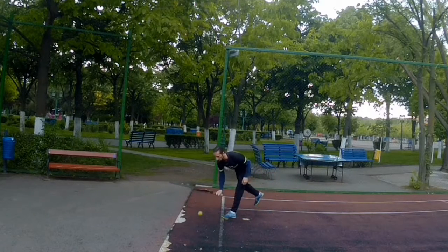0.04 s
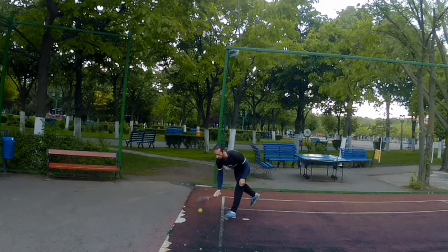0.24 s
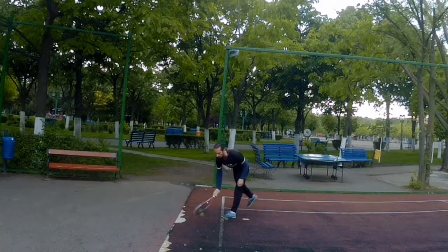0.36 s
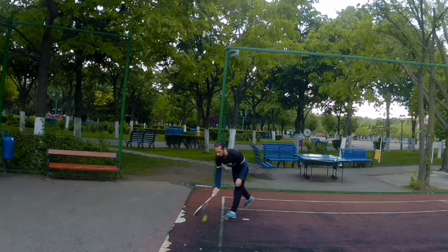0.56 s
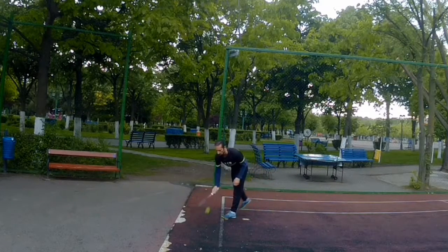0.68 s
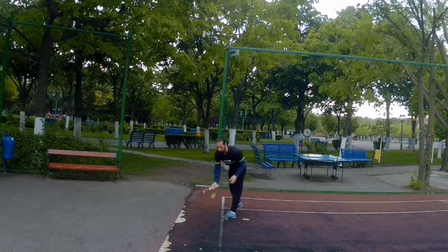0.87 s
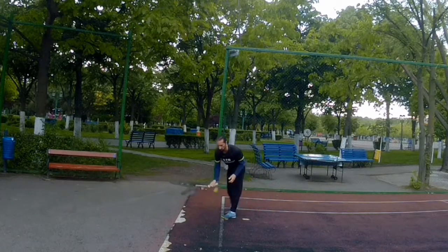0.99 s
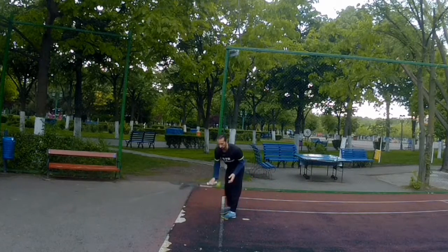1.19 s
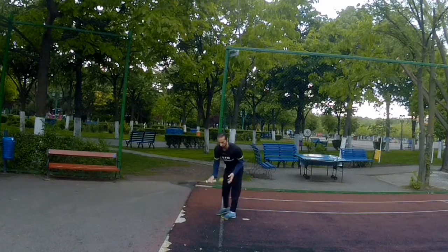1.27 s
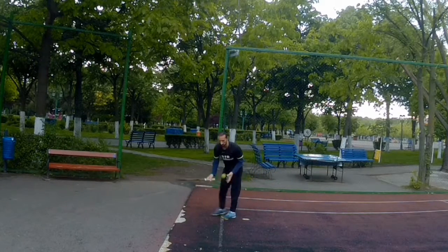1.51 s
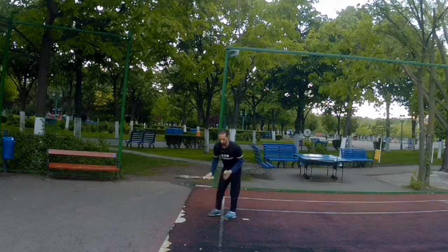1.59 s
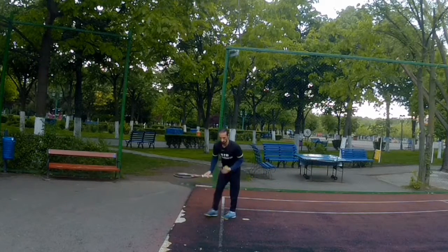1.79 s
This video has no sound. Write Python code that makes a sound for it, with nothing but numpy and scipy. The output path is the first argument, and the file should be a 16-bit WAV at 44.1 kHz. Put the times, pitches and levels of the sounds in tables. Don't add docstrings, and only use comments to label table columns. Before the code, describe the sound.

A tennis ball hit by a racket, slowed down and dull. A faint low swish leads to a loud deep thump and string crack at 0.2 seconds, chopped off with a click at 0.25. Scattered echoes fade until about 0.7. Soft knocks come near 0.87 and 1.58, the second with low footfall thuds. Quiet park rumble and tiny regular clicks run beneath, with a barely audible falling whistle around 1.5.

```python
import sys
import numpy as np
from scipy import signal
from scipy.fft import rfft, irfft, next_fast_len
from scipy.io import wavfile

SR = 44100
rng = np.random.default_rng(int(sys.argv[2]) if len(sys.argv) > 2 else 0)


def boost_factor(decibels):
    exponent = np.asarray(decibels, float) / 20
    return 10 ** exponent


def inscribe(sig):
    pcm = np.round(np.clip(np.atleast_2d(sig).T, -1, 1) * 32767)
    wavfile.write(sys.argv[1], SR, pcm.astype(np.int16))


N = 81585
CUT_S = 10952 / 44100


def rms_one(x):
    return x / np.sqrt(np.mean(x ** 2) + 1e-20)


def clock():
    return np.arange(N) / SR


def drift(rate):
    r = np.exp(-80 * np.pi * rate / SR)
    slow = signal.lfilter([1], [1, -2 * r, r * r], rng.standard_normal(N // 40 + 2002))[2000:]
    return np.interp(np.arange(N) / 40, np.arange(len(slow)), rms_one(slow))


def ring(clicks, hz, t60):
    r, w = boost_factor(-60 / (t60 * SR)), 2 * np.pi * hz / SR
    return signal.lfilter([0, np.sin(w)], [1, -2 * r * np.cos(w), r * r], clicks + 1e-18)


def click(s, size):
    return size * np.maximum(0, 1 - np.abs(np.arange(N) - s * SR))


def noise(spectrum, patchy_db, rate):
    size = next_fast_len(N)
    hz = np.maximum(np.arange(size // 2 + 1) * SR / size, 1)
    at, db = np.transpose(spectrum)
    shaped = rfft(rng.standard_normal(size)) * boost_factor(np.interp(np.log(hz), np.log(at), db))
    out, together = 0, drift(rate)
    for centre in 20 * 2 ** np.arange(9):
        share = np.cos(np.pi / 2 * np.clip(np.log2(hz / centre), -1, 1)) ** 2
        flicker = boost_factor(patchy_db * (0.47 * together + drift(rate)))
        out = out + flicker * irfft(shaped * share, size)[:N]
    return rms_one(out)


def ball_thump():
    # t/s, level/dB, sign
    blows = [(0.2095, -28, 0.84), (.2110, -22, 0.51), (0.2139, -20.5, -0.72), (0.2203, -18.5, 0.77),
             (0.2289, -28.5, -0.85), (0.2366, -37.5, 0.57)]
    # f/Hz, level/dB, 60 dB fade/s
    ball = [(78.6, -6.5, 0.079), (134.7, -8, 0.31), (206, -17, 1), (267, -10.5, 1), (330, -18.5, 0.56)]
    pushes = sum(click(s, sign * boost_factor(db)) for s, db, sign in blows)
    pushes = signal.sosfilt(signal.butter(2, 290, fs=SR, output="sos"), pushes)
    return sum(ring(pushes * boost_factor(db), hz, t60) for hz, db, t60 in ball)


def racket_crack():
    # f/Hz, level per Hz/dB
    crack = [(240, -55), (400, -6.5), (701, -8), (932, -4), (1600, -12), (2030, -16), (4200, -26.5),
             (5460, -62), (9240, -120)]
    # f/Hz, level/dB, 60 dB fade/s
    racket = [(586.4, 6, 0.043), (893, 8.5, 0.092), (994, 3.5, 0.18), (1272, -2, 0.13), (1605, -17, 0.11),
              (2008, -3, 0.09)]
    start_s, attack_s, t60_s = .209, 0.0013, 0.67
    crack_db, racket_db = -48, -52
    age = np.maximum(clock() - start_s, 0)
    shape = boost_factor(-60 * age / t60_s) * np.minimum(age / attack_s, 1)
    shake = shape * rng.standard_normal(N) / 20
    rings = sum(ring(shake * boost_factor(db), hz, t60) for hz, db, t60 in racket)
    rattle = shape * noise(crack, patchy_db=2.5, rate=140)
    return boost_factor(racket_db) * rings + boost_factor(crack_db) * rattle


def scattered_echo():
    # f/Hz, level per Hz/dB
    echo = [(29, -53), (50, -13), (144, -4), (190, -12), (260, -12), (527, -20), (708, -25.5), (953, -21),
            (4200, -47.5), (5460, -79), (9240, -120)]
    level_db, t60_s, rise_s = -50.5, 1.06, 0.031
    age = clock() - CUT_S
    late = np.maximum(age, 0)
    shape = boost_factor(level_db - 60 * late / t60_s) * (1 - 0.43 * np.exp(-late / rise_s))
    return (age >= 0) * shape * noise(echo, patchy_db=0.0, rate=20)


def distinct_echoes():
    # t/s, level of the lowest/dB, of the middle/dB, of the upper tones/dB
    returns = [(.268, -46, -61, -55), (.279, -60, -44, -49), (.296, -54, -49.5, -52), (.313, -44, -54, -46),
               (.340, -65, -49, -52), (.357, -58, -53.5, -47), (.388, -59, -54, -50.5),
               (.412, -67, -51, -51), (.430, -58, -62, -54.5), (.458, -48, -73, -59.5),
               (.490, -67.5, -55, -58.5), (.515, -62, -69, -67), (.615, -57.5, -77, -68.5),
               (.638, -63, -71, -54.5)]
    # f/Hz, level/dB, 60 dB fade/s, column of their level in returns
    reflected = [(112, -3, .08, 1), (143, -1, .09, 1), (262, 0, .055, 2), (418, -8, .05, 2),
                 (540, -10, .05, 2), (931, -8, .08, 3), (1380, -14, .05, 3), (1810, -17, .04, 3)]
    chance = rng.normal(0, 2.7, (len(returns), len(reflected)))
    out = 0
    for m, (hz, db, t60, group) in enumerate(reflected):
        clicks = 0
        for k, row in enumerate(returns):
            sign = (-1) ** k
            clicks = clicks + click(row[0], sign * boost_factor(row[group] + db + chance[k, m]))
        out = out + ring(clicks, hz, t60)
    return signal.sosfilt(signal.butter(1, 1500, fs=SR, output="sos"), out)


def soft_knocks():
    # t/s, level/dB, sign, pitch factor
    hits = [
        (0.8747, -48, 0.93, 0.95),
        (0.924, -61.5, -0.97, 0.97),
        (1.5792, -56, -0.86, 1.102),
        (1.5812, -47, 1, 1.006),
        (1.5875, -50.5, -0.88, 1.083),
    ]
    # f/Hz, level/dB, 60 dB fade/s
    tones = [(236.5, 2.5, 0.032), (340, 3, 0.043), (1035, -15.5, 0.048), (1460, -17, 0.031),
             (2770, -20, 0.023), (3380, -24, 0.037), (4040, -37, 0.011)]
    out = 0
    for s, db, sign, pitch in hits:
        for hz, tone_db, t60 in tones:
            out = out + ring(click(s, sign * boost_factor(db + tone_db)), hz * pitch, t60)
    return signal.sosfilt(signal.butter(1, 2500, fs=SR, output="sos"), out)


def felt_puffs():
    # t/s, level/dB, 60 dB fade/s
    puffs = [(.136, -68, .08), (.875, -64, .03), (.922, -75, .04), (1.580, -63, .04), (1.587, -63, .04)]
    # f/Hz, level per Hz/dB
    felt = [(290, -36), (500, 2), (625, -9), (2330, -20.5), (4200, -31.5), (5460, -62), (9240, -120)]
    t = clock()
    shape = sum((t > s) * boost_factor(db - 60 * np.abs(t - s) / t60) for s, db, t60 in puffs)
    return shape * noise(felt, patchy_db=1.0, rate=130)


def footfalls():
    # t/s, level/dB, f/Hz, 60 dB fade/s
    thuds = [(.137, -58, 110, .06), (1.5892, -42, 48, .07), (1.6035, -47, 32, .09), (1.703, -58, 70, .07)]
    return sum(ring(click(s, boost_factor(db)), hz, t60) for s, db, hz, t60 in thuds)


def racket_swing():
    # t/s, level/dB
    swing = [(.03, -69.5), (.065, -58.5), (.11, -58), (.125, -63.5), (.14, -54.5), (.2, -59), (.22, -64)]
    # f/Hz, level per Hz/dB
    swish = [(35, -32), (60, 7), (129, -6.5), (177, -20.5), (627, -14), (736, -26), (1010, -19.5),
             (4200, -54), (5460, -82), (9240, -120)]
    loudness = boost_factor(np.interp(clock(), *np.transpose(swing), left=-140, right=-140))
    return loudness * noise(swish, patchy_db=2.7, rate=24)


def far_whistle():
    # t/s, f/Hz, level/dB
    whistle = [(1.278, 530, -96), (1.381, 527, -87.5), (1.442, 519.4, -79.5), (1.552, 503, -77),
               (1.62, 497, -103)]
    t = clock()
    s, hz, db = np.transpose(whistle)
    phase = 2 * np.pi * np.cumsum(np.interp(t, s, hz) + 4 * drift(30)) / SR
    loudness = boost_factor(np.interp(t, s, db, left=-140, right=-140) + 5 + 3.5 * drift(40))
    return loudness * np.sin(phase)


def park_rumble():
    # f/Hz, level per Hz/dB
    colour = [(8.8, -25.5), (15, 2.5), (128, -16), (266, -17.5), (527, -31), (951, -34), (1290, -37.5),
              (4200, -53.5), (5460, -86), (9240, -120)]
    # t/s, level/dB
    swell = [(0.55, -61.5), (0.918, -61.5), (1.106, -62), (1.374, -64), (1.542, -62), (1.85, -61)]
    return boost_factor(np.interp(clock(), *np.transpose(swell))) * noise(colour, patchy_db=1.2, rate=14)


def camera_whine():
    whine_hz, whine_db = 3217, -93.5
    phase = 2 * np.pi * np.cumsum(whine_hz + 8 * drift(20)) / SR
    return boost_factor(whine_db + 2.2 * drift(15)) * np.sin(phase)


def scene():
    blow = ball_thump() + racket_crack()
    rest = scattered_echo() + distinct_echoes() + soft_knocks() + felt_puffs() + footfalls()
    rest = rest + racket_swing() + far_whistle() + park_rumble() + camera_whine()
    band = signal.ellip(8, .5, 60, 4200, fs=SR, output="sos")
    struck, rest = signal.sosfilt(band, [blow, rest])
    return (struck * (clock() < CUT_S) + rest)[None]


def roll_off(x):
    return signal.sosfilt(signal.butter(12, 15730, fs=SR, output="sos"), x)


def record(dry):
    # t/s, jump of the waveform/thousandths of full scale
    seams = [(0.063, 1.05), (0.155, -1.05), (0.248, -22.15), (0.341, 1.79), (0.434, -0.01), (0.527, 1.91),
             (0.62, -1.92), (0.713, 0.9), (0.806, 0.38), (0.899, 0.25), (0.991, -0.43), (1.084, 0.52),
             (1.177, -1.14), (1.27, 1.38), (1.363, -3.23), (1.456, -0.5), (1.549, 0.58), (1.642, 3.49),
             (1.734, -0.92), (1.827, -0.89)]
    first, every, hold = 2760, 4096, 4
    settle_s = 0.0066
    held = np.repeat(dry[:, ::hold], hold, axis=1)[:, :N]
    step = np.arange(N) // hold * hold
    out = held.copy()
    for k, (_, jump) in enumerate(seams):
        i = first + k * every
        missing = jump / 1000 - (held[0, i] - held[0, i - 1])
        side = np.where(step >= i, 1, -1)
        out += missing / 2 * side * np.exp(-np.abs(step - i + hold / 2) / (settle_s * SR))
    return roll_off(out)


dry = scene()
out = record(dry)
inscribe(out)
```